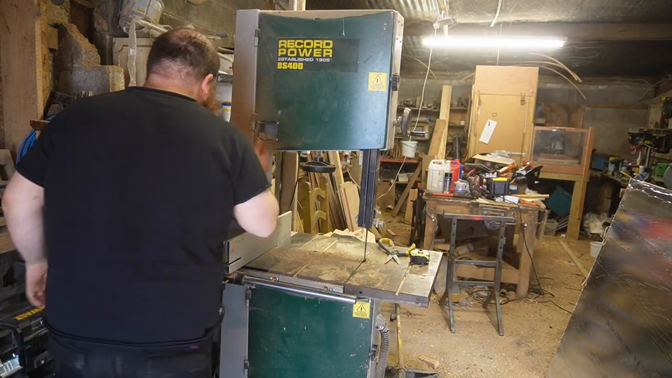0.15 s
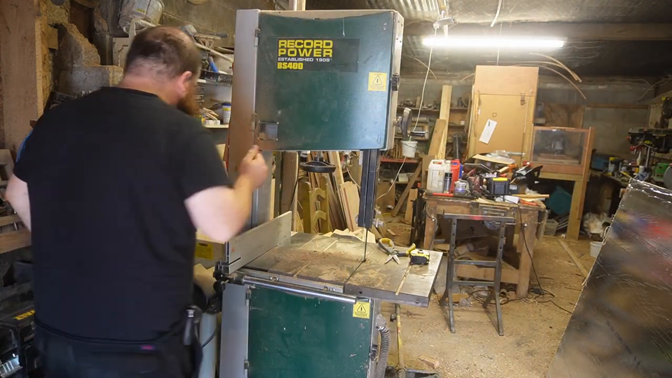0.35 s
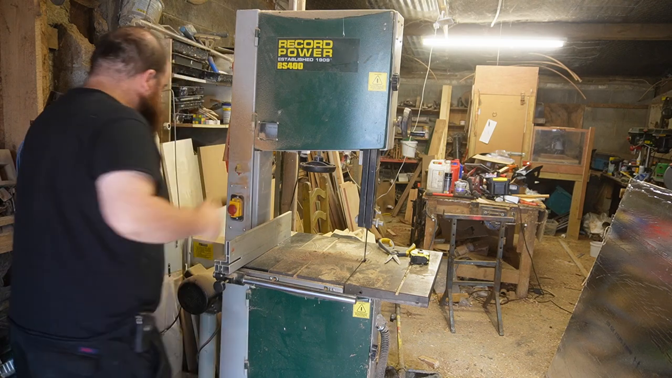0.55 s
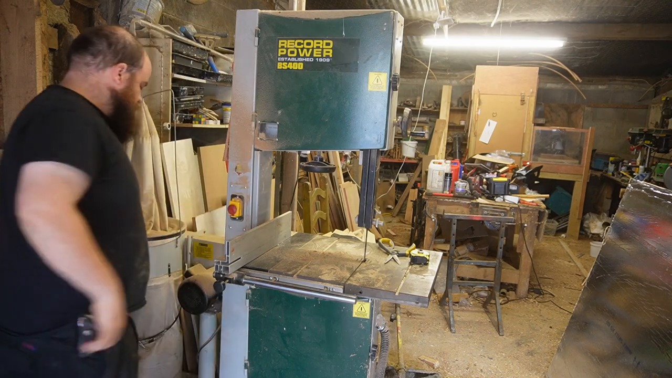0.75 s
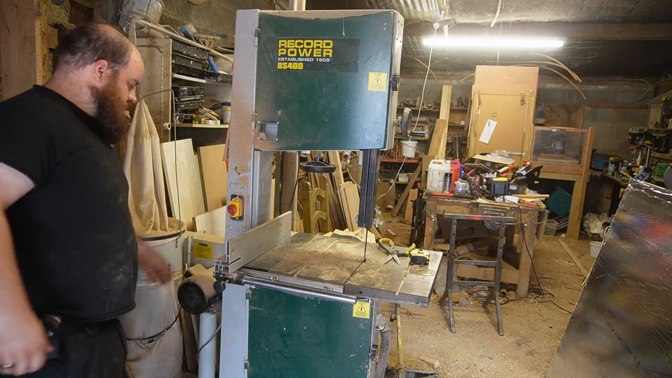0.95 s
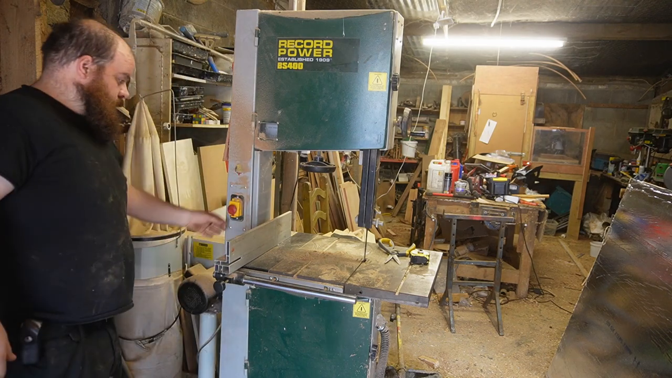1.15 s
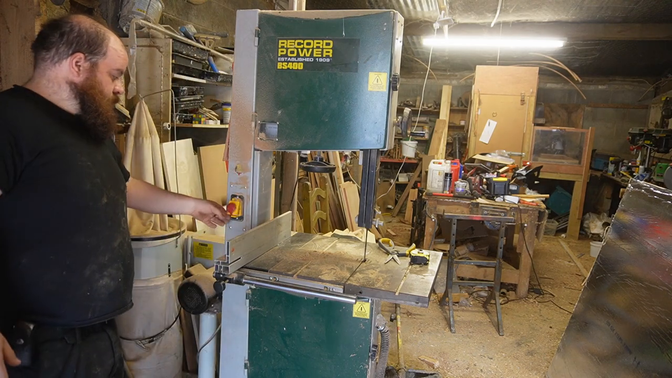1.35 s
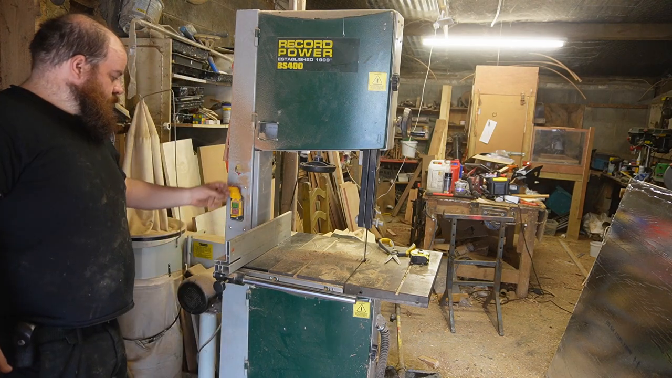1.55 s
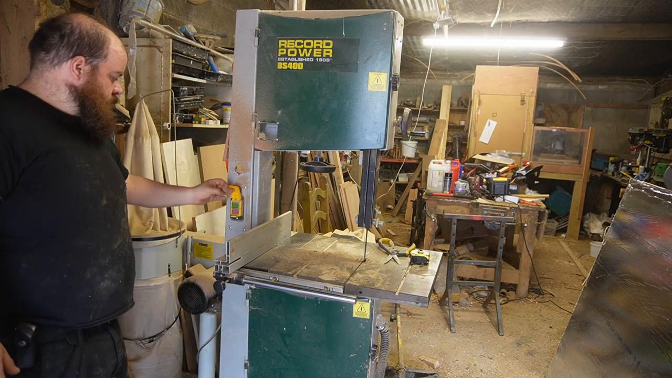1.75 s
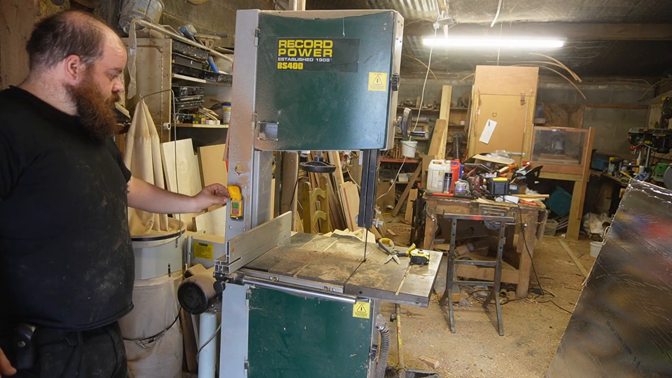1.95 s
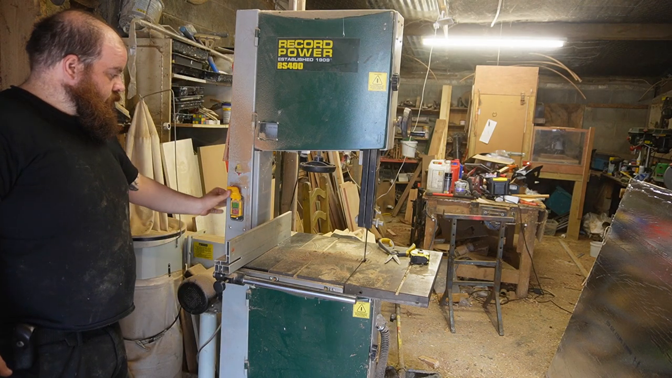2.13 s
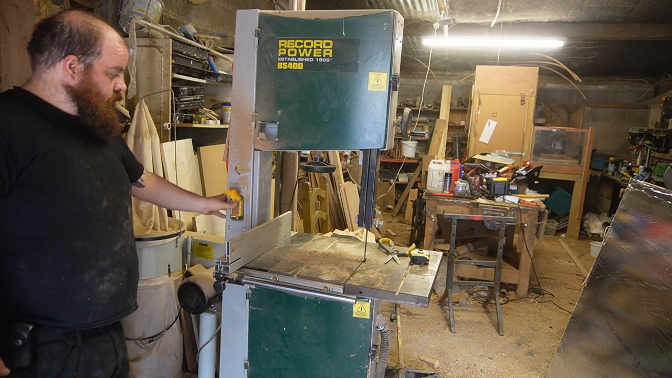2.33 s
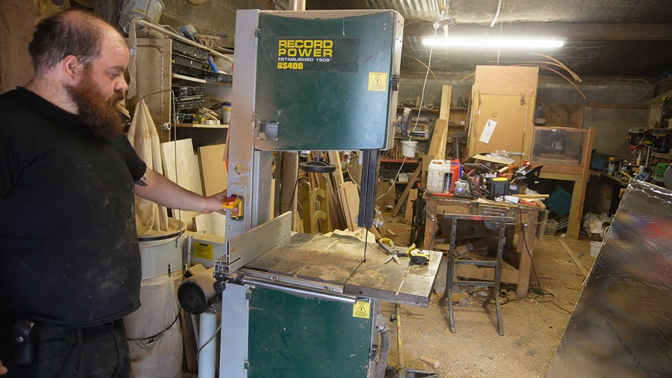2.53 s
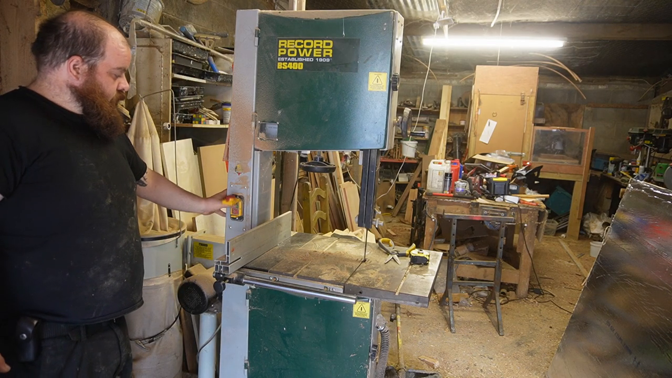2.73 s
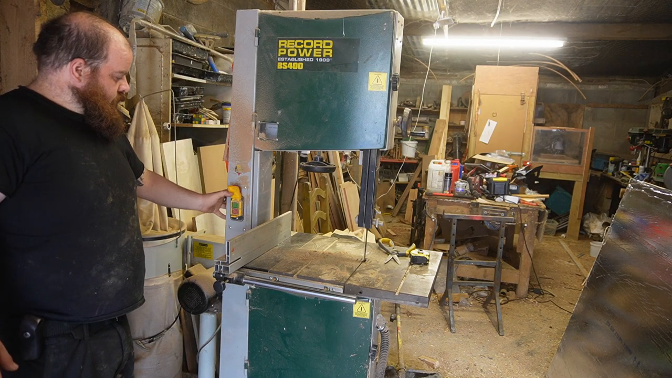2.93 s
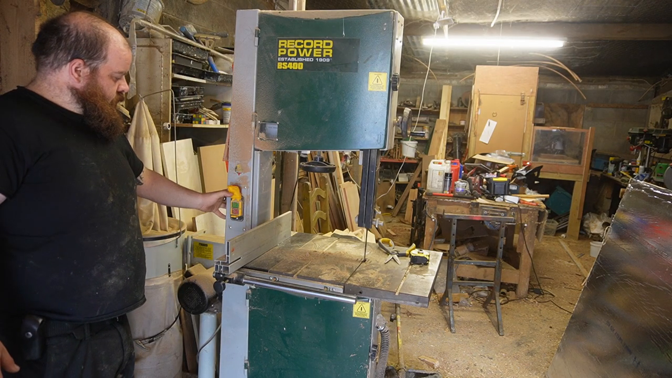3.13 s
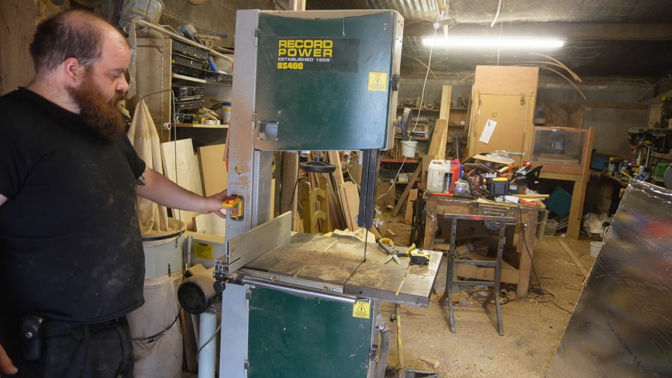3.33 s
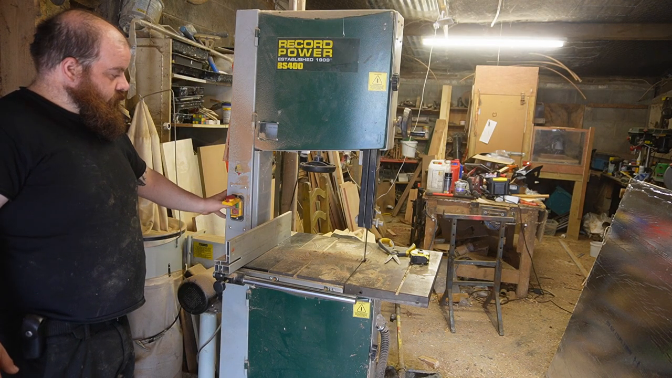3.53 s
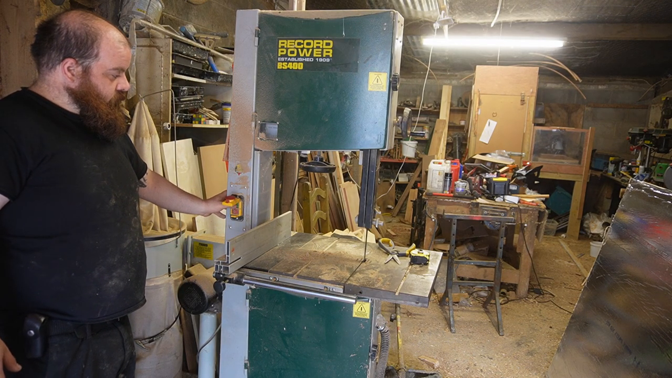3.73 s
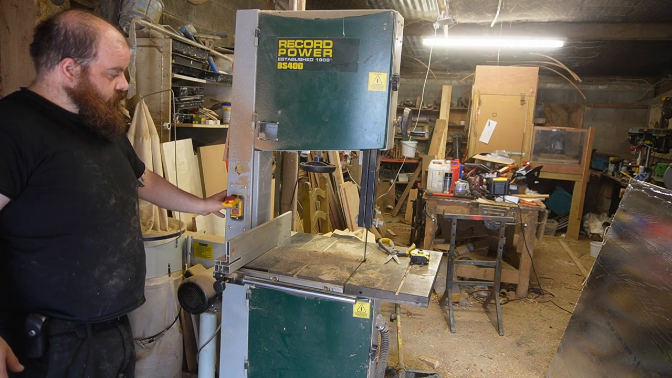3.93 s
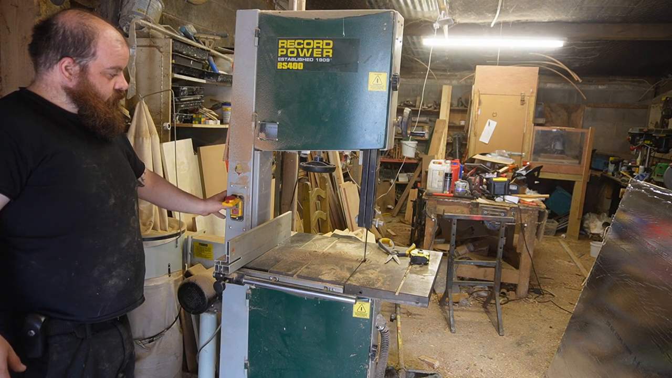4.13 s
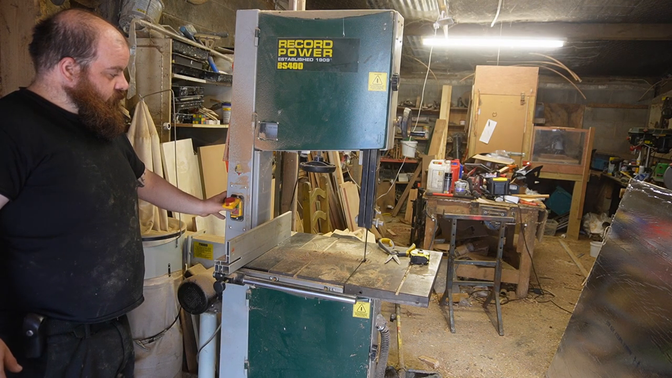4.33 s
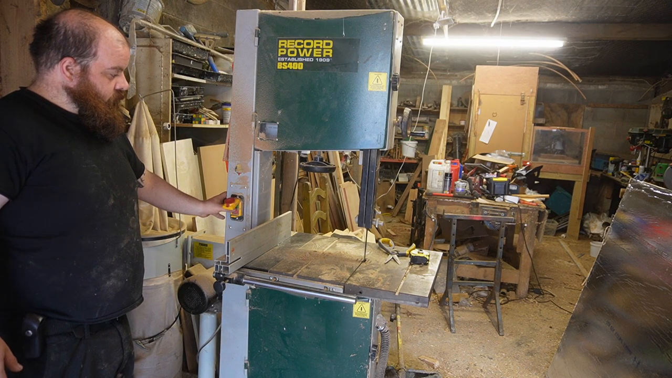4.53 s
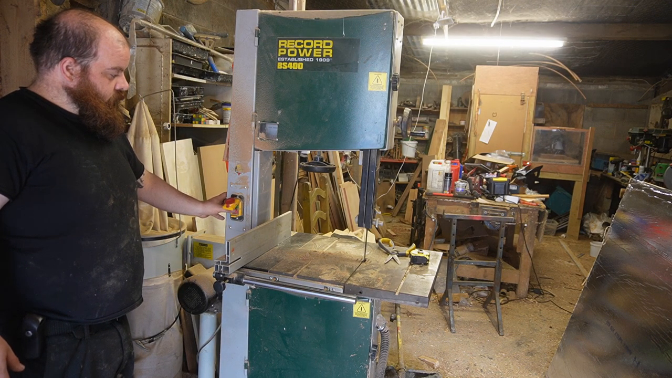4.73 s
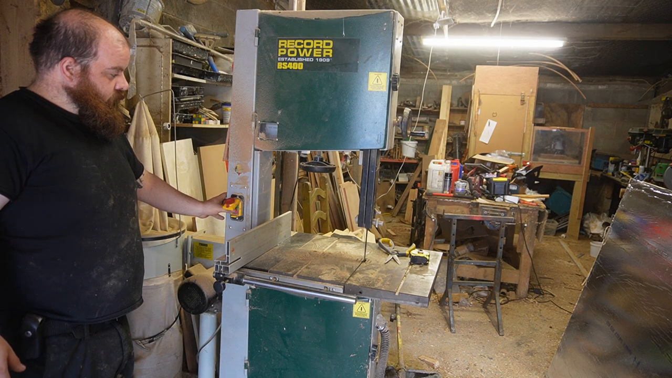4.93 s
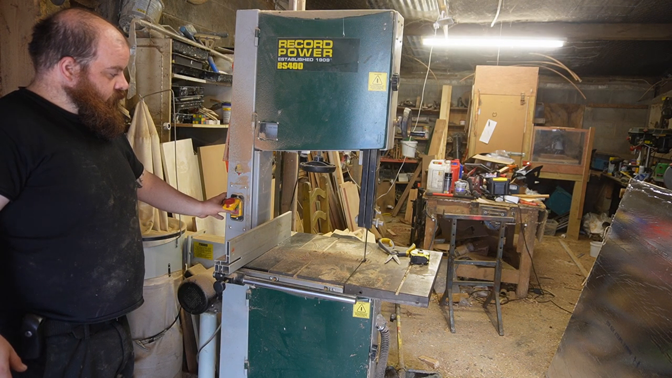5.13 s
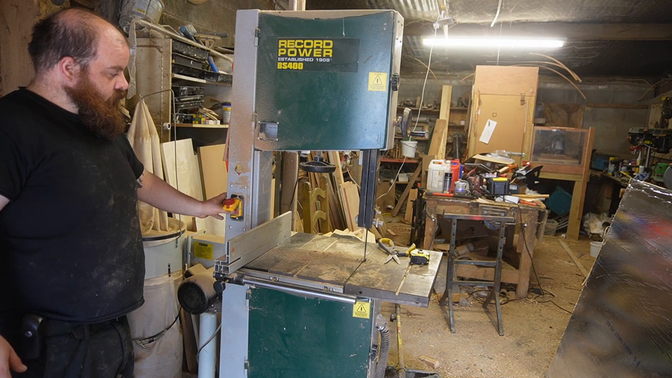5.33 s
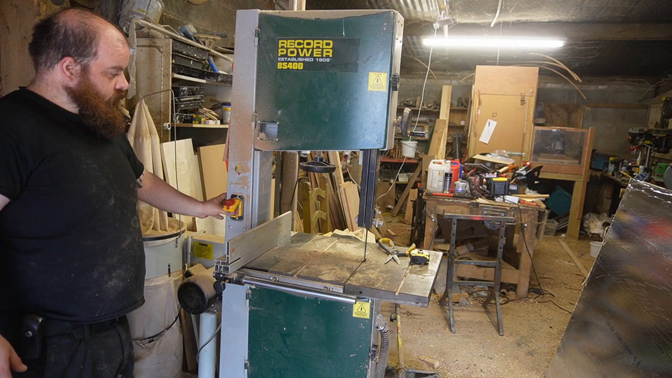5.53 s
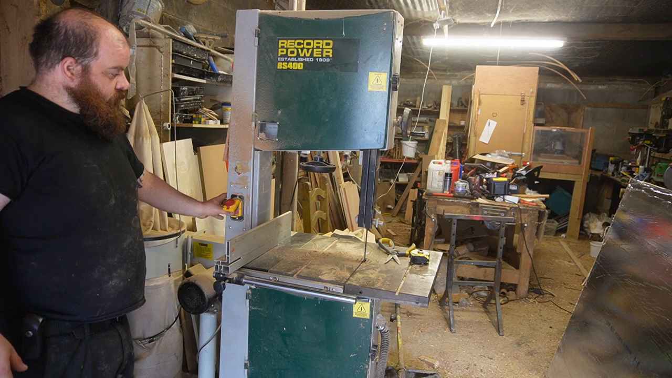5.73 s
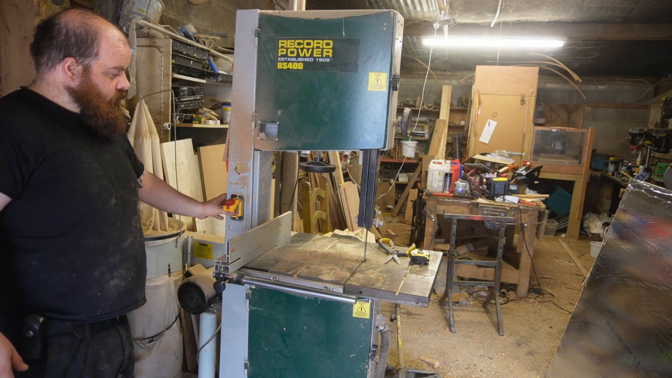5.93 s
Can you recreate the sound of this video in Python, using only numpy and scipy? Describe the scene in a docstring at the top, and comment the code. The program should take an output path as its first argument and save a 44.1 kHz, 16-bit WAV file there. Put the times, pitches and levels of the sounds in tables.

```python
"""Starting a bandsaw

In a small, cluttered workshop a man knocks the blade guard into place, steps round to the side,
fumbles with the switch cover and presses start. The slipping belt screeches and the motor buzzes
on 50 Hz mains as it hauls the wheels up to speed. Then the blade hisses and brushes its guides
over a growing rumble and hum."""
import sys
import numpy as np
from scipy import signal
from scipy.fft import rfft, irfft, next_fast_len
from scipy.io import wavfile
from scipy.ndimage import uniform_filter1d

SR = 44100
rng = np.random.default_rng(int(sys.argv[2]) if len(sys.argv) > 2 else 0)


def master_out(mix):
    """Clip the mix to full scale and print it as 16-bit PCM to the path in sys.argv[1]."""
    frames = np.transpose(np.atleast_2d(mix))
    ceiling = np.clip(frames, -1, 1)
    pcm = np.round(ceiling * 32767).astype(np.int16)
    wavfile.write(sys.argv[1], SR, pcm)


N = 263718
T = np.arange(N) / SR
POWER_ON_S, RUN_UP_S, MAINS_HZ = 3.77, 2.316, 50


def speed():
    """The wheels gain speed evenly: 0 is at rest, 1 is full speed."""
    return np.clip((T - POWER_ON_S) / RUN_UP_S, 0, 1)


# how strong the blade's hiss is from low to high pitch: f/Hz, level/dB
BLADE_COLOUR = [(760, -22), (1300, -6), (1710, -10.5), (2220, -1.5), (2410, -1), (5060, -4.5),
                (6170, -12.5), (6710, -10.5), (7220, -12), (8710, -12), (12200, -18.5), (15800, -13)]
# pitches at which the blade rings: f/Hz, width/Hz, level/dB
BLADE_RINGS = [(2445, 19, 10.5), (3395, 45, 3.3), (3780, 30, 6.7), (4270, 17, 6.7), (4930, 15, 6),
               (5830, 24, 9.5), (6540, 50, 9.2), (8050, 8.8, 2), (8490, 55, 11.7), (9130, 61, 4.4),
               (9830, 80, 10), (10330, 46, 6.5), (11440, 25, 10.6), (12700, 57, 4.7)]
# harder brushes against the guides: t/s, level/dB, rise/s, fade/s, extra treble/dB
BLADE_BRUSHES = [(4.067, -46, .04, 0.055, -6), (4.47, -33.5, 0.042, 0.054, -1.5),
                 (4.903, -43, .01, 0.062, 1), (5.023, -31.5, 0.021, 0.029, 4.5),
                 (5.168, -35, .008, 0.055, 3.5), (5.255, -22, .014, 0.035, 0),
                 (5.373, -32, 0.011, 0.055, 1), (5.557, -38.5, 0.022, 0.15, 5.5),
                 (5.827, -30.5, .012, 0.092, -0.5), (5.925, -30.5, .008, 0.035, 3),
                 (5.96, -23.5, .008, 0.045, 5.5)]

def blade(hiss_db=-32.5, split_hz=6500):
    """The blade rubs through its guides, louder with speed, and every brush makes the steel ring."""
    hiss = undb(hiss_db) * speed() ** 1.52
    grain = undb(drift(290)) * (1 + tooth_ticks())
    out = 0
    for band, is_treble in (("low", False), ("high", True)):  # each band wavers on its own
        brushes = sum(undb(db + treble_db * is_treble) * envelope(start, rise, 0, fade)
                      for start, db, rise, fade, treble_db in BLADE_BRUSHES)
        rubbing = undb(drift(28)) * hiss + brushes
        steel = rms(rubbing) * noise(BLADE_COLOUR, BLADE_RINGS, drive=rubbing * grain)
        out += signal.sosfilt(signal.butter(2, split_hz, band, fs=SR, output="sos"), steel)
    return out


def tooth_ticks(full_speed_per_s=45, fade_s=0.0028, level_db=2.5):
    """Teeth catch the guides at random, more often with speed: brief jumps in friction."""
    hits = (rng.random(N) < full_speed_per_s * speed() / SR) * rng.exponential(size=N)
    return undb(level_db) * linger(np.minimum(hits, 2), fade_s)


# tone colour of the rumble: f/Hz, level/dB
WHEEL_COLOUR = [(35, -61), (60, -27), (165, -12.5), (199, -1.5), (256, -13), (314, -4), (431, -4),
                (670, -3), (876, -6.5), (1060, -8.5), (1150, -12.5), (1700, -7), (2480, -19.5), (2600, -21),
                (3380, -21), (5720, -120)]
# pitches at which the frame rings: f/Hz, width/Hz, level/dB
FRAME_RINGS = [(122, 11, 1), (155, 8.5, 2.1), (356.6, 11, 5.2), (397.7, 9.3, 3.9), (605, 2.6, 8),
               (681.5, 12.8, 8), (1040, 34, 2.2), (1517, 8, 7.5), (1638, 4.5, 6.2), (1770, 9.8, 6.6)]

def wheels(rumble_db=-31, shake_db=-30, flutter_db=2):
    """The turning wheels shake the frame, hardest near full speed."""
    rumble = undb(rumble_db) * speed() ** 0.66
    shake = undb(shake_db) * speed() ** 5
    return undb(flutter_db * drift(25)) * (rumble + shake) * noise(WHEEL_COLOUR, FRAME_RINGS)


# tone colour of the rubbing belt: f/Hz, level/dB
BELT_COLOUR = [(47, -46), (80, -38), (197, -17.5), (418, -20), (477, -11), (556, -33), (1010, -29),
               (1500, -14.5), (1870, -23.5), (2230, -18.5), (3390, -16), (3870, -10.5), (5880, -26),
               (8930, -32.5), (15500, -47)]
# pitches at which the rubbing rings the steel: f/Hz, width/Hz, level/dB
STEEL_RINGS = [(332, 44, 1), (1595, 660, 1), (5060, 630, -1), (9230, 540, 4.5)]
# tones of the screech: f/Hz, level/dB, time to fade by 60 dB/s
BELT_TONES = [(1534, 0, .3), (1620, -9, .36), (1656, -10, .3), (2170, -11, .3), (2937, -9.5, .25),
              (3601, -11.5, .22), (3771, -7, .22), (3840, -9, .22), (3908, -11, .22), (4195, -10, .3),
              (4496, -14, .2)]

def belt(slip_db=-13.5, rub_db=-3, screech_db=-7):
    """The belt slips once on the standing pulley and makes the steel screech."""
    slip = undb(slip_db) * envelope(start=3.769, rise=0.01, hold=0.051, fade=0.029)
    grip = unit(undb(-0.5 * drift(170)))
    friction = slip * grip * rng.standard_normal(N)
    rub = colour(workshop(friction, echo_db=-3), BELT_COLOUR, STEEL_RINGS)
    screech = 0
    for hz, db, ring_s in BELT_TONES:
        energy = linger(slip ** 2, ring_s / np.log(1e6))
        loudness = undb(db + 3 * drift(110)) * unit(np.sqrt(energy))
        screech += loudness * np.sin(2 * np.pi * hz * T + .55 * drift(90))
    return rms(slip) * (undb(rub_db) * unit(rub) + undb(screech_db) * unit(screech))


# tones of the starting buzz: multiple of the mains frequency, level/dB
BUZZ_TONES = [(1, -16), (2, -9.5), (3, -4.5), (4, -13), (5, 0), (6, -2.5), (7, 7), (8, 6.5), (9, -2),
              (10, -3), (11, -6), (12, 0.5), (13, -5), (20, -8), (21, -4), (22, -5.5), (26, -7)]
# tone colour of the rattling panels: f/Hz, level/dB
RATTLE_COLOUR = [(280, -18), (480, -8), (794, 2), (919, -9.5), (1040, 2.5), (1120, -6), (5060, -29.5),
                 (7040, -39), (9000, -34.5), (11700, -44), (19800, -120)]

def motor_start(buzz_db=-41, strain_db=-33, rattle_db=-36, throb_db=-52, sag_db_per_s=4.5):
    """Heavy current in the starting coil buzzes and rattles the panels until the coil switches off."""
    current = envelope(POWER_ON_S, rise=0.078, hold=1.43, fade=.04)
    strain = current * swell(4.152, width=0.11)  # a judder: the shaft's rate passes through the stand's resonance
    loudness = undb(buzz_db) * current * (1 - speed()) ** 1.5 + undb(strain_db) * strain
    buzz = loudness * mains_tones(BUZZ_TONES, waver_db=-4, wavers_per_s=24, phase_drift=0.29)
    mains = np.sin(2 * np.pi * MAINS_HZ * T)
    throb = current * undb(throb_db - sag_db_per_s * (T - POWER_ON_S)) * unit(mains)
    rattle = undb(rattle_db) * strain * noise(RATTLE_COLOUR, drive=1 + 0.23 * mains)
    return buzz + throb + rattle


# tones of the running hum: multiple of the mains frequency, level/dB
HUM_TONES = [(2, -6), (4, 11.5), (6, 7.5), (8, -14), (12, -6)]

def motor_hum(full_speed_db=-35):
    """The running motor hums louder as it gains speed."""
    loudness = undb(full_speed_db) * speed() ** 1.54
    return loudness * mains_tones(HUM_TONES, waver_db=-1.5, wavers_per_s=14, phase_drift=0.51)


def mains_tones(tones, waver_db, wavers_per_s, phase_drift):
    """Wavering multiples of the mains; the frame delays each differently, smearing them into a growl."""
    out = 0
    for multiple, db in tones:
        phase = 2 * np.pi * multiple * MAINS_HZ * T + np.pi * multiple ** 2 / 6
        loudness = undb(db + waver_db * drift(wavers_per_s))
        out += loudness * np.sin(phase + phase_drift * drift(wavers_per_s))
    return unit(out)


# booms of the panels: t/s, f/Hz, level/dB, half-width/s
PANEL_BOOMS = [(4.29, 312.5, -39.5, 0.044), (4.58, 679, -40.5, 0.027), (4.78, 680, -37.5, 0.02),
               (4.94, 313, -37, 0.031), (5.215, 687, -33.5, .025), (5.39, 313, -31, .075)]

def panels():
    """Short swelling tones: panels boom as the rising speed passes the pitches they ring at."""
    out = 0
    for peak, hz, db, width in PANEL_BOOMS:
        tone = unit(np.sin(2 * np.pi * hz * T + .5 * drift(9.8)))
        out += undb(db) * swell(peak, width) * tone
    return out


# knocks on the guard: t/s, low/dB, middle/dB, treble/dB, main ring/Hz, contact/s
KNOCKS = [(.007, -52, -32, -32.5, 2600, 0.013), (.063, -44, -38, -46, 870, 0.006),
          (.119, -25.5, -16.5, -21, 573, 0.012), (.222, -40.5, -42, -41, 816, 0.012),
          (.262, -53, -32, -33, 2640, 0.018), (.381, -71, -38.5, -37.5, 2560, 0.021)]
# tone colour of the guard: f/Hz, level/dB
GUARD_COLOUR = [(35, -56.5), (60, -33), (174, -9.5), (577, -5.5), (711, -8.5), (835, -0.5), (960, -6.5),
                (2200, 0), (4110, -6.5), (15000, -30.5)]
# pitches at which it rings: f/Hz, width/Hz, level/dB
GUARD_RINGS = [(556, 47, 1), (848, 23, 3), (2300, 220, 13), (2660, 96, -3.5), (4160, 70, 4.5),
               (6280, 65, 10.5)]

def guard():
    """The blade guard rings as it is knocked into place."""
    return blows(KNOCKS, GUARD_COLOUR, GUARD_RINGS, grit_db=2.5, echo_db=-6.5, ring_db=6.5)


# shoes meeting the floor: t/s, low/dB, middle/dB, treble/dB, main ring/Hz, contact/s
FOOTFALLS = [(.593, -45, -33.5, -40, 2100, 0.016), (.722, -41.5, -39, -58, 810, 0.015),
             (.756, -43.5, -39.5, -44, 490, 0.0047), (.776, -38, -37, -43, 486, 0.0055),
             (.867, -46.5, -61, -75, 400, 0.0022), (.903, -44, -49, -54, 407, 0.0076),
             (1.079, -48, -51, -53, 600, 0.0092), (1.183, -50.5, -43.5, -55, 1700, 0.013)]
# tone colour of a step: f/Hz, level/dB
SHOE_COLOUR = [(59, -41), (100, -14), (180, -2), (268, -9.5), (337, -2), (492, 0.5), (1020, -6), (1560, -3),
               (2800, -6.5), (15000, -45)]
# pitches at which a step rings: f/Hz, width/Hz, level/dB
SHOE_RINGS = [(353, 16, 3.7), (390, 16, 5.3), (507, 8.8, 5), (545, 10, 4.1), (1760, 26, 2)]

def footsteps():
    """Shoes tap and scuff the floor in a short shuffle."""
    return blows(FOOTFALLS, SHOE_COLOUR, SHOE_RINGS, grit_db=3, echo_db=-2.5, ring_db=5)


# clicks, the start button last: t/s, low/dB, middle/dB, treble/dB, main ring/Hz, contact/s
CLICKS = [(1.502, -57, -56, -62, 1500, .003), (1.649, -41, -43.5, -54.5, 845, 0.0094),
          (2.102, -46.5, -43, -45, 4450, 0.0027), (2.245, -47, -61, -62, 844, .005),
          (2.455, -55, -73, -63, 437, 0.011), (2.881, -34.5, -32, -32, 830, 0.0071),
          (3.32, -60, -78, -77, 300, 0.019), (3.765, -32.5, -30.5, -32.5, 700, 0.0047)]
# tone colour of the switch: f/Hz, level/dB
SWITCH_COLOUR = [(71, -63), (120, -16.5), (180, 1), (306, -16), (530, 7), (611, 0), (829, -1), (1320, -8.5),
                 (1530, -2), (1990, -4), (2390, 3.5), (5610, -8.5), (15500, -31)]
# pitches at which it rings: f/Hz, width/Hz, level/dB
SWITCH_RINGS = [(400, 120, 2), (980, 430, -3.5), (1570, 520, -4), (5400, 400, -1.5), (7200, 1400, -1),
                (14300, 11000, 0)]

def switch():
    """Fingers click against the plastic switch and its cover."""
    return blows(CLICKS, SWITCH_COLOUR, SWITCH_RINGS, grit_db=5, echo_db=3, ring_db=7.5)


def blows(hits, shape, rings, grit_db, echo_db, ring_db):
    """Each blow is a gritty push that rings a body; harder blows have more middle and treble."""
    out, t = np.zeros((2, N + SR)), T[:SR // 2]
    bands = [signal.butter(3, edge_hz, kind, fs=SR, output="sos")
             for edge_hz, kind in [(1300, "low"), ([1300, 3700], "band"), (3700, "high")]]
    for start_s, *band_db, hz, contact_s in hits:
        white, grit = rng.standard_normal((2, len(t)))
        push = white * undb(grit_db * grit) * np.sqrt(t) * np.exp(-t / contact_s)
        ring = colour(workshop(push, echo_db), shape, [*rings, (hz, hz / 6, ring_db)])
        start = int(start_s * SR)
        for band, db in zip(bands, band_db):
            part = signal.sosfilt(band, ring)
            opening_level = np.std(part[:, :SR // 25])  # the first 40 ms
            out[:, start:start + len(t)] += part * undb(db) / opening_level
    return out[:, :N]


# the man's movements: t/s, length/s, level/dB
MOVEMENTS = [(0, 0.1, -39.5), (0.155, 0.12, -33.5), (0.601, .2, -43.5), (.93, .05, -58.5),
             (1.111, .12, -50.5), (1.903, 0.47, -59.5)]
# tone colour of the rustle: f/Hz, level/dB
RUSTLE_COLOUR = [(71, -29), (120, -16.5), (156, -0.5), (264, -10.5), (535, 0.5), (682, -7.5), (1040, -6.5),
                 (1280, -7), (4740, -11.5), (15000, -29)]

def rustle():
    """Clothes rub and soles drag as the man moves."""
    moving = sum(undb(db) * envelope(start, rise=0.025, hold=length, fade=0.11)
                 for start, length, db in MOVEMENTS)
    return moving * noise(RUSTLE_COLOUR, drive=undb(1.35 * drift(130)))


# creaks of the hinge: t/s, length/s, level/dB
HINGE_CREAKS = [(1.792, .13, -60), (1.938, 0.012, -39.5), (1.972, 0.044, -50), (2.032, .012, -49)]
# tone colour of the switch cover: f/Hz, level/dB
COVER_COLOUR = [(1200, -35), (2400, -1), (3300, -6), (4100, 2.5), (7500, -4.5), (9000, -20), (15000, -30)]
# pitches at which it rings: f/Hz, width/Hz, level/dB
COVER_RINGS = [(4110, 190, 6), (5250, 100, 8), (5820, 89, 3), (7400, 200, 1)]

def cover(grit_db=3):
    """The hinge sticks and slips in short bursts that ring the plastic cover."""
    creak = sum(undb(db) * envelope(start, rise=.002, hold=length, fade=0.011)
                for start, length, db in HINGE_CREAKS)
    return rms(creak) * noise(COVER_COLOUR, COVER_RINGS, drive=creak * undb(grit_db * drift(300)))


# a sole squeaks twice, then a bearing starts to turn: t/s, f/Hz, width/Hz, level/dB, fade/s
FRICTION_SQUEAKS = [(.846, 13900, 1000, -53, .02), (1.181, 1770, 200, -37.5, 0.039),
                    (4.08, 10000, 350, -65, .2)]

def squeaks():
    """Rubbing makes a narrow band of noise that starts quickly and fades."""
    out = np.zeros((2, N))
    for start, hz, width, db, fade in FRICTION_SQUEAKS:
        peak = signal.iirpeak(hz, hz / width, fs=SR)
        friction = rng.standard_normal((2, N))
        tone = signal.lfilter(*peak, signal.lfilter(*peak, friction))
        out += undb(db) * unit(tone) * envelope(start, rise=.006, hold=0, fade=fade)
    return stereo(out)


# how long the room echoes: f/Hz, time to fade by 60 dB/s
ECHO_TIMES = [(150, 0.81), (530, 0.44), (1400, 0.48), (3700, 0.26), (10000, 0.22)]

def workshop(x, echo_db):
    """Add the room's echo: noise that stores the sound's energy and loses the treble first."""
    count = len(x)
    hz, times, frames = signal.stft(rng.standard_normal((2, count)), SR, nperseg=256)
    energy = np.interp(times, T[:count], uniform_filter1d(x ** 2, size=128))
    decay = 1e6 ** (-times / value_at(ECHO_TIMES, hz)[:, None])
    decay /= decay.sum(axis=1, keepdims=True)
    stored = signal.fftconvolve(energy[None], decay, axes=1)[:, :len(times)]
    echo = signal.istft(frames * np.sqrt(abs(stored)), SR)[1][:, :count]
    scattered = x * rng.choice([-1, 1], count)  # nearby clutter throws sound sideways at once
    return stereo(undb(echo_db) * echo + [x, scattered])


# tone colour of the quiet room: f/Hz, level/dB
AIR_COLOUR = [(15, -40), (25, -15), (267, -3.5), (313, -8.5), (368, -2), (537, -12), (2490, -16.5),
              (2770, -18.5), (4260, -19), (4620, -19.5), (5430, -22), (15500, -37.5)]

def air(level_db=-57):
    """The workshop's air is a faint, almost steady rush."""
    return noise(AIR_COLOUR) * undb(level_db + 0.2 * drift(4.4))


# stereo width, as the sides compared with the middle: f/Hz, level/dB
STEREO_WIDTH = [(50, -21), (250, -19.5), (500, -21.5), (1000, -15), (2000, -11), (4000, -8), (8000, -5),
                (12000, -1.5)]

def stereo(pair):
    """Turn a middle and a side signal into left and right: the bass is shared, the treble wide."""
    middle, side = pair
    return middle + np.array([[1], [-1]]) * colour(side, STEREO_WIDTH)


def noise(shape, rings=(), drive=1):
    """Stereo noise, made stronger or weaker by drive, rings a body; the result has level 1."""
    return unit(stereo(colour(drive * rng.standard_normal((2, N)), shape, rings)))


def colour(x, shape, rings=()):
    """Give a sound a broad tone colour with ringing pitches on top."""
    n = 2 * next_fast_len(x.shape[-1] // 2 + 4096)
    f = np.arange(n // 2 + 1) * SR / n
    # keeping only the first half of the cepstrum stops the filter sounding before it is struck
    cepstrum = irfft(np.log(undb(value_at(shape, f))))
    first_half = 2 * cepstrum[:n // 2] * (np.arange(n // 2) > 0)
    broad = np.exp(rfft(first_half, n) + cepstrum[0])
    ringing = 1 + sum(undb(db) * 1j * f * width / (hz ** 2 - f ** 2 + 1j * f * width)
                      for hz, width, db in rings)
    return irfft(rfft(x, n) * broad * ringing)[..., :x.shape[-1]]


def value_at(points, hz):
    """Read between (f/Hz, value) points along a pitch scale."""
    known_hz, values = np.transpose(points)
    return np.interp(np.log(hz + 1), np.log(known_hz), values)


def envelope(start, rise, hold, fade):
    """Rise in a straight line, stay until hold seconds after the start, then die away."""
    age = T - start
    return np.clip(age / rise, 0, 1) * np.exp(-np.maximum(age - hold, 0) / fade)


def swell(peak, width):
    """A bell-shaped rise and fall around one moment."""
    return np.exp(-.5 * ((T - peak) / width) ** 2)


def linger(x, fade_s):
    """Let every value leave a fading trail."""
    return signal.lfilter([1], [1, -np.exp(-1 / (fade_s * SR))], x)


def drift(turns_per_s):
    """Wander at random around 0, typically by about 1."""
    return np.interp(T * turns_per_s, np.arange(2048), rng.standard_normal(2048))


def undb(db):
    """Turn decibels into a multiplier."""
    return 10 ** (np.asarray(db) / 20)


def rms(x):
    """Average level (root mean square)."""
    return np.sqrt(np.mean(x ** 2))


def unit(x):
    """Scale to an average level of 1."""
    return x / rms(x)


def scene():
    """Man and machine over the quiet air of the workshop."""
    background = air()
    handling = guard() + footsteps() + switch() + rustle() + cover() + squeaks()
    saw = belt() + motor_start() + motor_hum() + panels() + wheels() + blade()
    return background + handling + saw


def record(dry, top_hz=15900):
    """Cut away the highest treble."""
    return signal.sosfilt(signal.ellip(10, .2, 80, top_hz, fs=SR, output="sos"), dry)


dry = scene()
out = record(dry)
master_out(out)
```